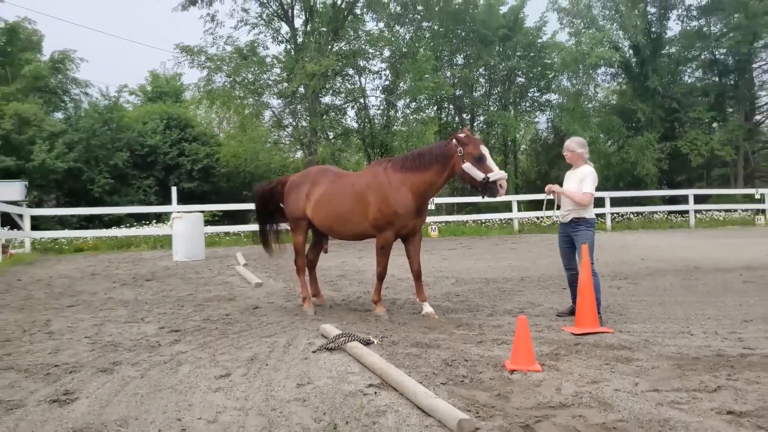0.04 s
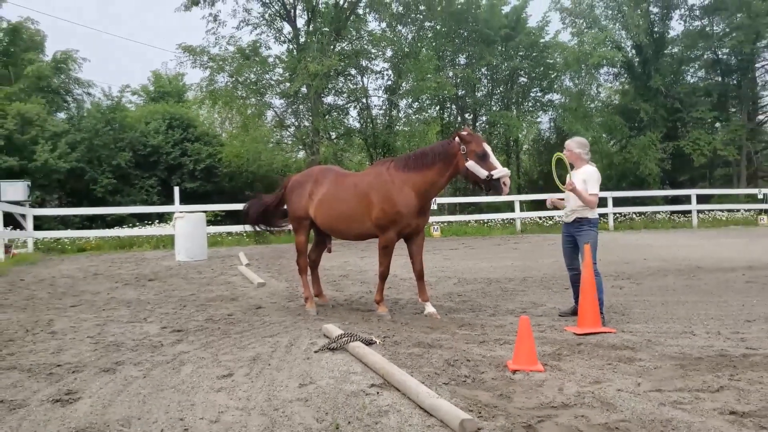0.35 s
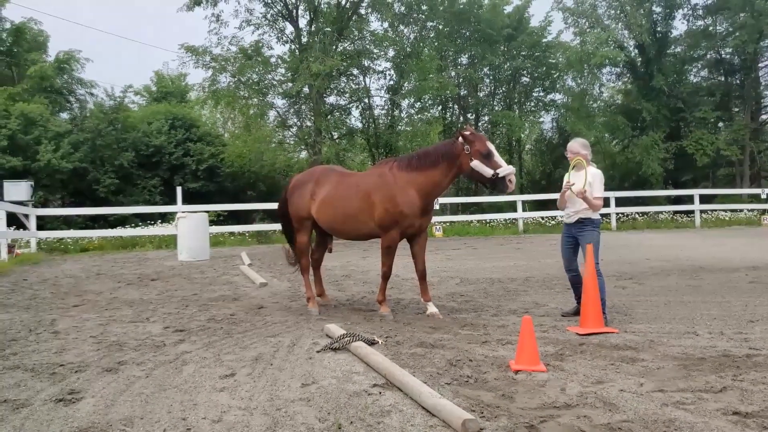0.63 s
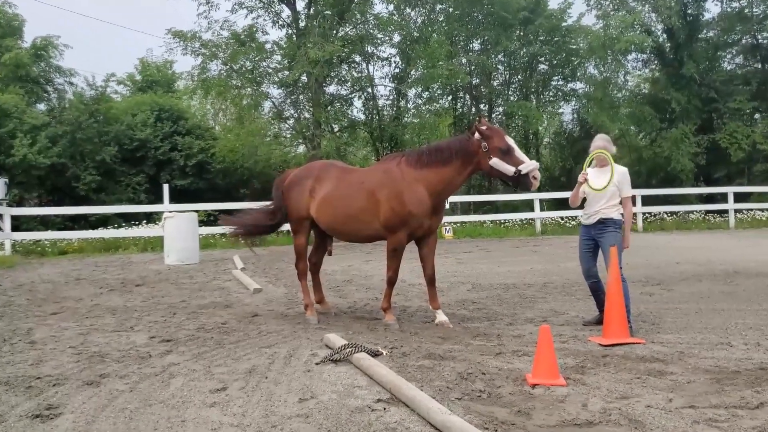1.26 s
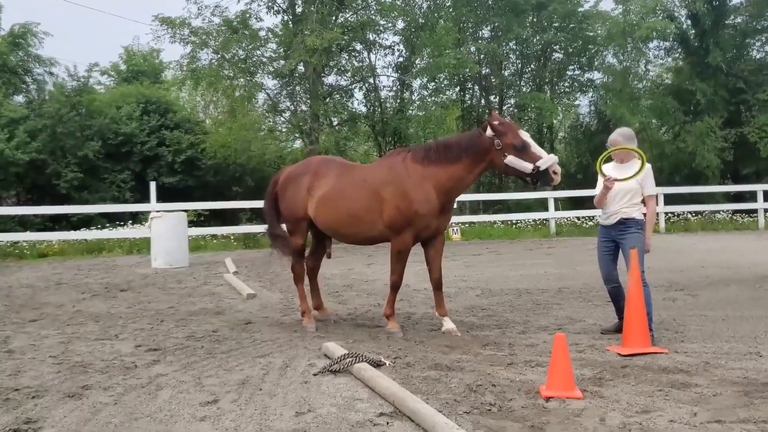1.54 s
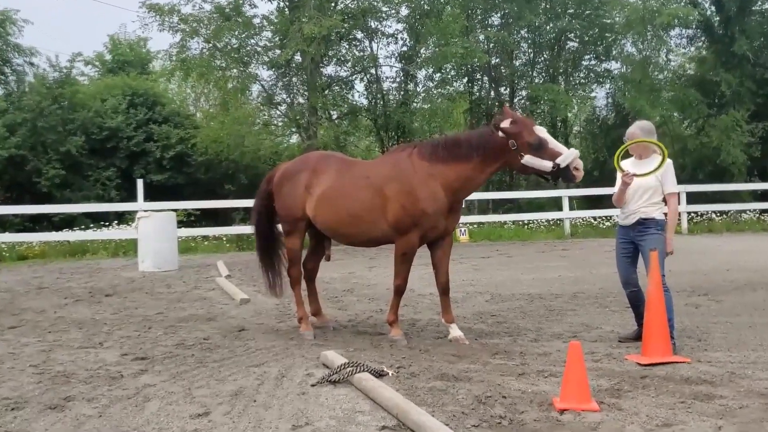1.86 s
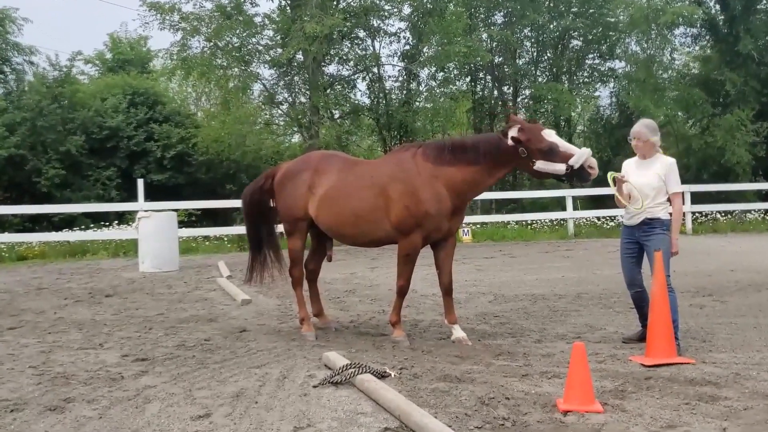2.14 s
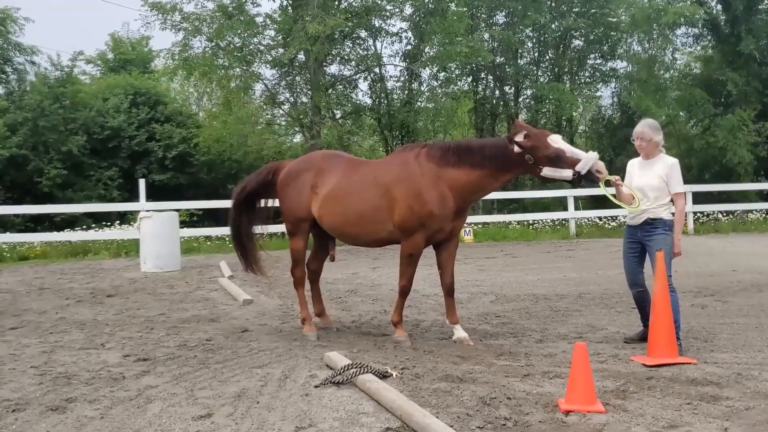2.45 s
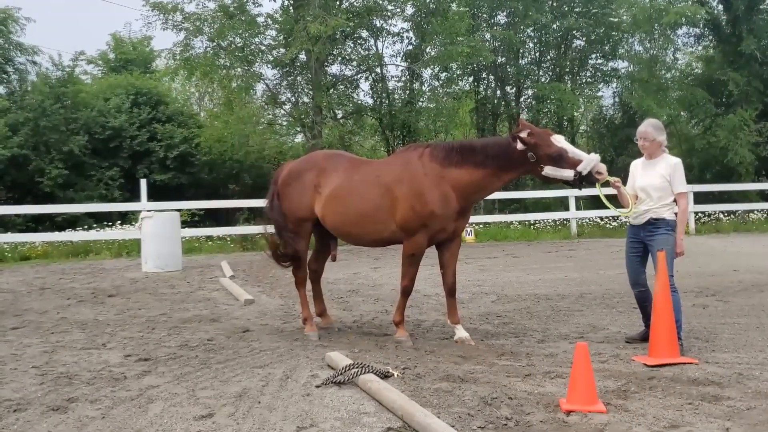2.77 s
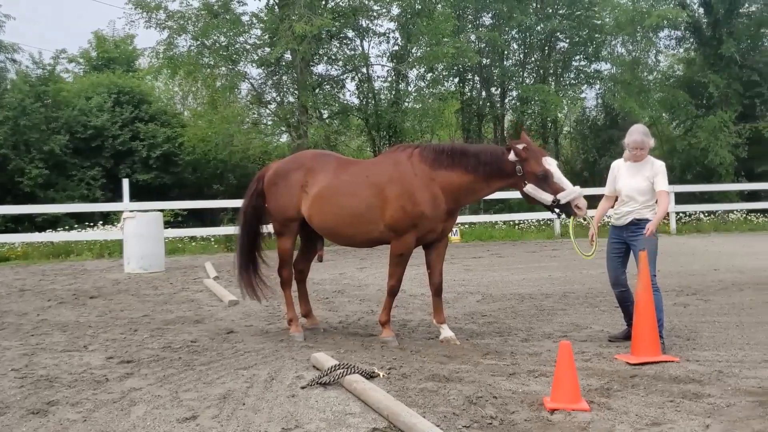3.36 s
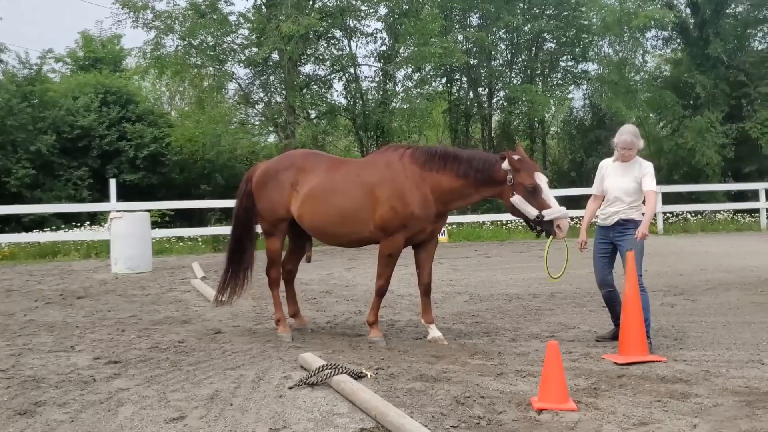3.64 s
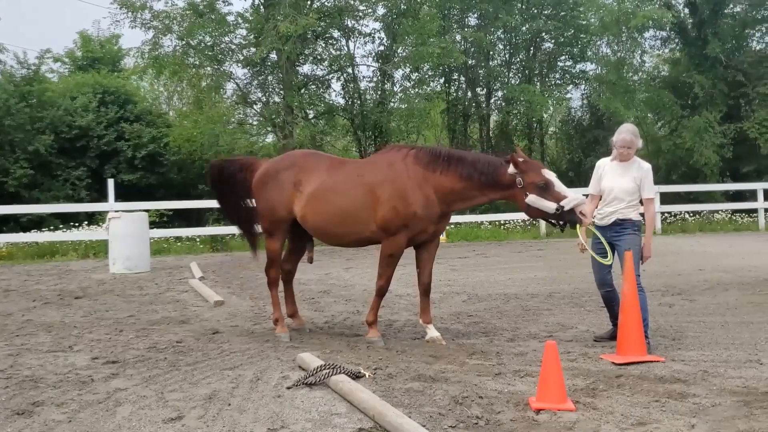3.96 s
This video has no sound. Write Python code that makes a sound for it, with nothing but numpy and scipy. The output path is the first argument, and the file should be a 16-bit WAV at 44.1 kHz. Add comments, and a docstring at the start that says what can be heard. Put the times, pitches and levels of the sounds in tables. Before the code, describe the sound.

Birdsong with bright repeating chirps, over light wind and soft handling bumps.

```python
"""A sandy riding arena ringed by trees, where a warbler repeats a phrase of three arched notes.
A thrush carols below it and smaller birds slur and whistle farther off. Each note is a gliding tone
that the foliage scatters and the tree line answers; the most distant birds are only a blur of noise,
joined once by a hoarse animal call. Light wind and handling rumble on the microphone,
and a few soft scuffs come from the sand over a bed of quiet air."""
import sys
import numpy as np
from scipy import signal
from scipy.fft import rfft, irfft, next_fast_len
from scipy.io import wavfile
from scipy.ndimage import uniform_filter1d, map_coordinates

SR = 44100
rng = np.random.default_rng(int(sys.argv[2]) if len(sys.argv) > 2 else 0)


def int16_out(signal):
    """Quantize to a 16-bit WAV file."""
    q = np.round(np.clip(np.atleast_2d(signal).T, -1, 1) * 32767)
    wavfile.write(sys.argv[1], SR, q.astype(np.int16))


N = 176400

# Tone colours of the noise layers. Each row: frequency in Hz, relative level in dB.
AIR_COLOUR = [(76, -22.5), (130, -8), (162, -4.5), (449, -13.5), (1650, -19), (1790, -20.5), (1970, -21),
              (4670, -18.5), (5480, -25.5), (6690, -31.5), (7850, -40.5), (14300, -40.5), (15500, -15)]
TOP_HISS_COLOUR = [(6000, -17), (9000, -4), (12000, 2.5), (15500, -3.5)]
GRIT_COLOUR = [(2000, -19), (5000, 4), (8000, -11), (10000, 1), (12000, -14.5), (15500, 3.5)]
THUD_COLOUR = [(150, -23), (400, 5), (800, 8), (1400, -1.5), (3000, -16.5)]
WIND_COLOUR = [(11, -43.5), (18, -10), (38, -0.5), (61, 0.5), (84, -8), (145, -22), (400, -44), (520, -105),
               (880, -120)]
FAR_CHORUS_COLOUR = [(1800, -29.5), (2700, -9.5), (3700, 2), (5200, 5), (6200, -17.5), (7500, -35.5)]
RASP_COLOUR = [(2000, -28.5), (2700, -2), (4000, 3), (6000, -0.5), (7000, -12), (8000, -27), (9300, -6),
               (10400, -7.5), (11500, -18.5), (15000, -21)]
# Fader rides for top hiss, wind and far chorus. Each row: time in seconds, level in dB.
TOP_HISS_RIDE = [(0, -100), (.1, -77.5), (.32, -79.5), (.39, -89), (.58, -86.5), (.8, -86.5), (1.05, -88),
                 (1.17, -88), (1.3, -94), (1.7, -85), (1.85, -90), (2.05, -90), (2.22, -72.5), (2.45, -95),
                 (2.6, -89), (2.8, -81.5), (3.03, -84.5), (3.16, -77), (3.36, -92.5), (3.6, -74),
                 (3.75, -86), (4, -86)]
WIND_RIDE = [(0, -52.5), (.1, -44), (.2, -54), (.33, -55.5), (.45, -50.5), (.58, -49.5), (.68, -59),
             (.76, -58.5), (.83, -49), (.94, -53), (1.02, -63), (1.12, -66), (1.22, -56), (1.35, -62),
             (1.52, -66.5), (1.6, -51), (1.75, -44), (1.9, -46), (2.02, -46.5), (2.16, -49.5), (2.25, -56),
             (2.4, -53.5), (2.55, -54), (2.68, -48), (2.85, -53), (2.97, -70), (3.1, -57), (3.22, -59.5),
             (3.3, -57), (3.45, -53.5), (3.6, -58.5), (3.72, -55.5), (3.8, -50), (3.92, -62.5), (4, -67.5)]
FAR_CHORUS_RIDE = [(0, -75), (.3, -68.5), (.55, -75), (.75, -84.5), (1.5, -79), (2, -69.5), (4, -65)]
# Swells of a thin whine. Each row: centre in seconds, half width in seconds, level in dB.
WHINE_SWELLS = [(0.218, 0.045, -69), (1.156, 0.044, -73.5), (2.813, 0.057, -70.5), (3.87, 0.077, -74.5)]
# Scuffs in the sand. Each row: centre and half width in seconds, grit level in dB, thud over grit in dB.
SAND_SCUFFS = [(0.122, 0.086, -75.5, -8), (.31, 0.0097, -80, -30), (0.48, 0.008, -89, 10.5),
               (0.593, 0.015, -75, 3.5), (2.042, .02, -91.5, 15.5)]
# High ticks, and songs blurred by distance.
# Each row: centre and half width in seconds, pitch and spread in Hz, level in dB.
HIGH_TICKS = [(0.311, 0.0093, 10000, 500, -73.5), (.317, 0.011, 14800, 400, -74)]
BLURRED_SONGS = [(0.017, 0.035, 2356, 320, -74.5), (0.14, 0.044, 3700, 605, -66.5),
                 (0.434, 0.17, 2925, 419.6, -73.5), (.4, 0.088, 3630, 501, -78.5),
                 (.66, 0.034, 2744, 501, -78), (0.665, 0.033, 1760, 251, -82), (.82, .03, 2365, 340, -70.5),
                 (1.147, 0.093, 4190, 605, -78), (1.51, .035, 3640, 351, -73),
                 (3.725, 0.057, 3100, 260, -65), (3.6, 0.25, 1777, 179, -84.5)]
# Bumps of the hand. Each row: centre in seconds, pitch in Hz, peak level in dB.
HAND_BUMPS = [(0.07, 56, -31.5), (.455, 49.3, -40), (0.924, 52, -38.5), (1.168, 53.7, -37.5),
              (1.739, 54, -33), (1.905, 70, -34.5), (2.009, 65.2, -40), (2.637, 47.2, -37.5),
              (2.693, 53.5, -37.5), (2.777, 55, -39.5), (2.811, 66.6, -34), (3.401, 49.7, -47),
              (3.85, 53.5, -40)]
# A distant animal's call. Each row: time in seconds, pitch in Hz, level in dB.
ANIMAL_CALL = [(1.001, 612, -92), (1.061, 674, -75), (1.101, 698, -79), (1.139, 739, -74),
               (1.219, 780, -73.5), (1.281, 810, -80), (1.36, 810, -75.5), (1.46, 766, -92)]
# The small birds' slurs. Each row: start and length in seconds, first and last pitch in Hz,
# mid-note level in dB, leaf scatter over direct sound in dB.
BIRD_SLURS = [(-.015, 0.074, 6250, 4830, -64, 3), (0.136, 0.067, 6900, 4730, -69, 2),
              (0.241, 0.046, 4750, 3610, -63.5, 13), (0.286, .085, 3840, 5060, -68.5, 1),
              (0.515, 0.09, 5020, 3250, -68, 4), (1.093, .025, 7600, 5950, -88, -2),
              (1.154, 0.059, 5880, 5310, -63.5, -8.5), (1.305, 0.024, 7960, 4540, -73, 4),
              (1.338, 0.025, 4700, 5850, -66, -3), (1.352, 0.052, 5950, 5380, -62, -2.5),
              (1.336, 0.1, 3340, 3135, -76, 3), (1.497, 0.046, 7530, 4480, -77, -8),
              (1.548, 0.068, 5850, 5140, -63, -6), (1.564, 0.097, 2610, 2550, -73.5, -3),
              (1.669, 0.066, 6930, 4870, -64, 0), (1.942, 0.042, 6330, 4870, -65, 4),
              (2.452, 0.042, 4700, 3420, -62.5, -1), (2.887, 0.052, 4800, 3304, -51.5, -6.5),
              (3.02, 0.034, 4500, 3120, -52, 7), (3.727, .04, 6660, 4890, -70, -3),
              (3.836, 0.046, 6720, 3877, -64, -16)]
# A whistle's octave overtone. Each row: its frequency in Hz, gain in dB before each bird's own trim.
OVERTONE_COLOUR = [(4800, -31), (6000, -11.5), (7000, -25), (8000, -32), (9200, -30.5), (10300, -21),
                   (11500, -55), (15000, -44)]
# The thrush's notes, a list for each. Each row: time in seconds, pitch in Hz, level in dB,
# trill depth in Hz.
THRUSH_NOTES = [
    [(2.905, 2570, -80, 0.0053), (2.925, 2460, -52, 0), (2.94, 2303, -56, 0), (2.952, 2270, -84, 0.0055)],
    [(2.958, 2420, -56, 0), (2.975, 2473, -57.5, 0), (2.997, 2330, -44.5, 0), (3.015, 2370, -60, 0),
     (3.032, 2340, -57, 0.0043), (3.042, 2400, -65, 0)],
    [(3.043, 2466, -61, 0), (3.065, 2467, -45.5, 0), (3.088, 2347, -46.5, 0), (3.1, 2300, -59, 0)],
    [(3.103, 2386, -64, 0), (3.122, 2446, -47, 0), (3.14, 2315, -43, 0), (3.165, 2308, -60, 0),
     (3.18, 2286, -55, 0.018)],
    [(3.415, 2320, -58.5, 18), (3.455, 2776, -46.5, 170), (3.48, 3200, -45.5, 147),
     (3.494, 3222, -45.5, 50.5), (3.502, 2494, -41, -11), (3.525, 2340, -44, 3), (3.542, 2400, -57, -4)],
    [(3.555, 2450, -61, 37), (3.585, 2700, -50.5, 143), (3.615, 2842, -43, 175), (3.638, 3150, -45.5, 66),
     (3.654, 3047, -40.5, 38), (3.662, 2483, -45, 23), (3.677, 2352, -44.5, 10), (3.693, 2320, -89, 0)],
]
# The warbler's note shapes. A soft lead-in rises into the high arch; the other side of the syrinx sings
# under the broad one. Each row: time from the cue in seconds, pitch in Hz, level in dB, all before
# the cue's stretch, pitch factor and level apply.
LEAD_IN_SHAPE = [(-.045, 2658, -42), (-.02, 2850, -32), (0, 3110, -28.5), (.018, 3500, -24),
                 (.026, 3700, -32)]
HIGH_SHAPE = [(-.025, 2780, -58.5), (0, 3050, -32), (.018, 3444, -14.5), (.024, 4553, -2),
              (.033, 5316, -10), (.043, 5433, -3), (.053, 5150, -4), (.060, 3995, -3), (.066, 3330, -11.5),
              (.072, 3250, -21)]
BROAD_SHAPE = [(0, 3231, 0.5), (.008, 3369, -8.5), (.015, 4326, 1), (.023, 4896, 3), (.035, 5030, -3),
               (.048, 4795, 3.5), (.056, 3700, -4.5), (.064, 3500, -10.5), (.075, 3325, -14.5),
               (.086, 3035, -4)]
UNDERTONE_SHAPE = [(0, 2371, -27.5), (.025, 2700, -24.5), (.042, 3090, -16), (.058, 3500, -12.5),
                   (.072, 3600, -8.5)]
LOW_SHAPE = [(0, 3020, -20), (.012, 3359, -6.5), (.022, 3910, -7.5), (.028, 4334, -5), (.035, 4400, -5),
             (.040, 3950, -8.5), (.047, 3040, -9.5), (.053, 2810, -28)]
# Cues for those shapes. Each row: time in seconds, level in dB, stretch factor, pitch factor,
# leaf scatter over direct sound in dB.
HIGH_CUES = [(1.703, -47.5, 0.94, 0.97, -1), (2.096, -41.5, 0.97, 1, -1.5), (2.577, -43.5, 1.03, 0.98, 1.5),
             (3.049, -43.5, .92, 0.97, 1), (3.492, -42.5, 1.13, 0.98, 1), (3.937, -43, 0.95, .99, -1.5)]
BROAD_CUES = [(1.768, -51, 0.95, 1.028, 4), (2.165, -43.5, 1, 1.022, -4.5), (2.645, -46.5, 0.94, 1.04, 2.5),
              (3.113, -44, 0.94, .97, -1), (3.567, -46, 0.96, 1.02, 7)]
LOW_CUES = [(1.852, -42.5, 0.98, 1.057, -7.5), (2.247, -41.5, 1, 0.98, -9.5),
            (2.733, -41.5, 0.93, 0.99, -3.5), (3.2, -37, 0.91, .98, -5), (3.654, -41.5, 0.81, 0.99, -1.5)]


def amp(db):
    """Decibels as a gain."""
    return 10 ** (np.asarray(db) / 20)


def unit(x):
    """Scale to an rms of 1."""
    return x / np.sqrt(np.mean(x ** 2) + 1e-30)


def colour_gain(colour, hz):
    """A tone colour's gain at hz, read along a log frequency axis."""
    knots_hz, db = np.transpose(colour)
    return amp(np.interp(np.log(hz + 1), np.log(knots_hz + 1), db))


def clock():
    """Scene time in seconds."""
    return np.arange(N) / SR


def ride(rows):
    """A fader ride as one level per sample."""
    return np.interp(clock(), *np.transpose(rows))


def swell(centre, half_width):
    """A bell-shaped envelope, timed in seconds."""
    return np.exp(-((clock() - centre) / half_width) ** 2 / 2)


def wobble(rate, size=N):
    """A smooth random curve with rate knots a second."""
    knots = rng.standard_normal(int(size * rate / SR) + 4)
    return map_coordinates(knots, [np.arange(size) * rate / SR])


def noise(colour):
    """Noise of rms 1 in the given tone colour."""
    white = rfft(rng.standard_normal(N))
    return unit(irfft(white * colour_gain(colour, np.fft.rfftfreq(N, 1 / SR)), N))


def noise_band(hz, spread_hz):
    """A narrow band of noise, rms 1, around a steady or moving pitch."""
    phase = 2 * np.pi * np.cumsum(hz * np.ones(N)) / SR
    return unit(wobble(spread_hz) * np.sin(phase) + wobble(spread_hz) * np.cos(phase))


def band_swells(rows):
    """One swell of narrow noise for each row."""
    return sum(amp(db) * swell(s, half) * noise_band(hz, spread) for s, half, hz, spread, db in rows)


def air_bed(air_db=-73, whine_hz=15574):
    """Still outdoor air, a wavering top hiss and a thin whine that comes and goes."""
    air = amp(air_db + 2.3 * wobble(11)) * noise(AIR_COLOUR)
    whine_level = sum(amp(db) * swell(s, half) for s, half, db in WHINE_SWELLS)
    whine = whine_level * noise_band(whine_hz, spread_hz=54)
    hiss = amp(ride(TOP_HISS_RIDE) + 1.9 * wobble(25)) * noise(TOP_HISS_COLOUR)
    return air + hiss + whine


def sand():
    """Soft scuffs, each a gritty hiss over a dull thud, and two small ticks."""
    grit = noise(GRIT_COLOUR) * amp(2.5 * wobble(300))
    thud = noise(THUD_COLOUR)
    out = band_swells(HIGH_TICKS)
    for s, half, db, thud_db in SAND_SCUFFS:
        out += amp(db) * swell(s, half) * (grit + amp(thud_db) * thud)
    return out


def wind():
    """Light wind buffets the microphone into a low rumble."""
    return amp(ride(WIND_RIDE)) * noise(WIND_COLOUR)


def handling(half_width_s=0.0096):
    """The hand bumps the microphone: short pulses of bass."""
    return sum(amp(db) * swell(s, half_width_s) * np.cos(2 * np.pi * hz * (clock() - s))
               for s, hz, db in HAND_BUMPS)


def far_birds():
    """Birds deep in the wood blur into a wash, with single songs swelling out as narrow noise."""
    wash = amp(ride(FAR_CHORUS_RIDE) + 1.2 * wobble(24.85)) * noise(FAR_CHORUS_COLOUR)
    return wash + band_swells(BLURRED_SONGS)


def far_animal():
    """One hoarse call: a band of noise that climbs in pitch and sags at the end."""
    s, hz, db = np.transpose(ANIMAL_CALL)
    envelope = np.interp(clock(), s, amp(db), left=0, right=0)
    return envelope * noise_band(np.interp(clock(), s, hz), spread_hz=270)


def whistle(rows, jitter, flutter_db, glide_s=0.0025, trill_hz=88):
    """A wavering tone and its octave overtone, along rows of time, pitch, level and optional trill."""
    s, *columns = np.transpose(rows)
    t = np.arange(s[0], s[-1], 1 / SR)
    glide = max(int(glide_s * SR), 1)
    hz, db, *trill_depth = [uniform_filter1d(np.interp(t, s, column), glide) for column in columns]
    trill = sum(trill_depth) * np.sin(2 * np.pi * trill_hz * t)
    hz = hz * (1 + jitter * wobble(600, len(t))) + trill
    phase = 2 * np.pi * np.cumsum(hz) / SR
    fade = signal.windows.tukey(len(t), .1)
    envelope = np.sqrt(2) * amp(db + flutter_db * wobble(200.6, len(t))) * fade
    overtone = colour_gain(OVERTONE_COLOUR, 2 * hz) * np.sin(2 * phase + .3 * wobble(900, len(t)))
    return envelope * np.sin(phase), envelope * overtone


def trees(x, near_db, far_db, near_t60=0.16, far_t60=1.3, far_rise_s=0.026):
    """Direct sound, quick scatter from nearby leaves and the long answer of the tree line."""
    t = np.arange(SR) / SR
    near = rng.standard_normal(SR) * amp(-60 * t / near_t60)
    far = rng.standard_normal(SR) * amp(-60 * t / far_t60) * (1 - np.exp(-t / far_rise_s))
    response = amp(near_db) * near / np.linalg.norm(near) + amp(far_db) * far / np.linalg.norm(far)
    response[0] += 1  # the direct path
    return signal.fftconvolve(x, response / np.linalg.norm(response))


def small_birds(bend=1.5, edge_db=-15.5):
    """Pure slurs that glide fast at first and then level off; far ones arrive mostly scattered."""
    out, progress = np.zeros(N), np.linspace(0, 1, 9)
    for s, length, start_hz, end_hz, db, scatter_db in BIRD_SLURS:
        hz = end_hz + (start_hz - end_hz) * (1 - progress) ** bend
        level_db = db + edge_db * (2 * progress - 1) ** 2
        rows = np.transpose([s + length * progress, hz, level_db])
        tone, _ = whistle(rows, jitter=.007, flutter_db=1)
        add(out, s, trees(tone, near_db=scatter_db, far_db=scatter_db - 3.5, near_t60=0.15))
    return out


def thrush(overtone_db=-6.5):
    """Four mellow whistled notes, then two trilled rises that drop back."""
    out = np.zeros(N)
    for rows in THRUSH_NOTES:
        tone, overtone = whistle(rows, jitter=0.0067, flutter_db=1.5)
        add(out, rows[0][0], trees(tone + amp(overtone_db) * overtone, near_db=-3.5, far_db=-17.5))
    return out


def rasp(song_power, blur_s=.035, gain_db=-20):
    """An airy, flickering halo of noise that follows the loudness of the warbler's notes."""
    blur = signal.windows.hann(int(2 * blur_s * SR))
    envelope = np.sqrt(abs(signal.fftconvolve(song_power, blur / blur.sum(), "same")))
    return envelope * noise(RASP_COLOUR) * amp(gain_db + 4.5 * wobble(150))


def warbler(ground_db=-14):
    """Three arched whistles per phrase bounce off the ground; their overtones linger in the leaves."""
    out, song_power = np.zeros(N), np.zeros(N)
    for shape, cues, overtone_db in [(LEAD_IN_SHAPE, HIGH_CUES, 19), (HIGH_SHAPE, HIGH_CUES, -1),
                                     (BROAD_SHAPE, BROAD_CUES, 1), (UNDERTONE_SHAPE, BROAD_CUES, 11),
                                     (LOW_SHAPE, LOW_CUES, -3)]:
        for s, db, stretch, pitch, scatter_db in cues:
            rows = [(s + t * stretch, hz * pitch, db + level) for t, hz, level in shape]
            start = rows[0][0]
            tone, overtone = whistle(rows, jitter=0.0084, flutter_db=2.0)
            add(out, start, trees(tone, near_db=scatter_db, far_db=-14.5))
            ground_delay_s = .009 * rng.uniform(0.54, 1.5)
            add(out, start + ground_delay_s, amp(ground_db) * tone)
            add(out, start, trees(amp(overtone_db) * overtone, near_db=1.5, far_db=-15.5, near_t60=0.3))
            add(song_power, start, tone ** 2)
    return out + rasp(song_power)


def add(out, s, x):
    """Mix x in at s seconds, trimmed to the scene."""
    i = round(s * SR)
    x = x[max(-i, 0):max(N - i, 0)]
    out[max(i, 0):max(i, 0) + len(x)] += x


def scene():
    """The mono mix: wildlife over microphone rumble, sand and air."""
    wildlife = warbler() + thrush() + small_birds() + far_birds() + far_animal()
    return (wildlife + wind() + handling() + sand() + air_bed())[None]


def record(dry):
    """The recorder keeps nothing above its band limit."""
    top_hz, size = 15800, next_fast_len(N + SR // 2)
    passband = np.fft.rfftfreq(size, 1 / SR) < top_hz
    return irfft(rfft(dry, size) * passband, size)[..., :N]


dry = scene()
out = record(dry)
int16_out(out)
```